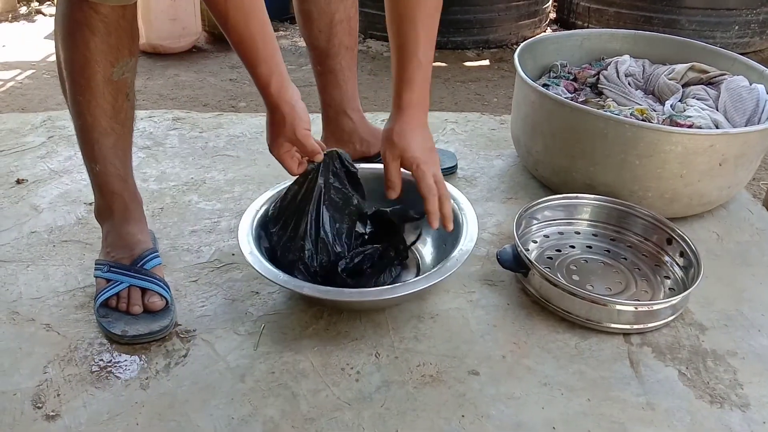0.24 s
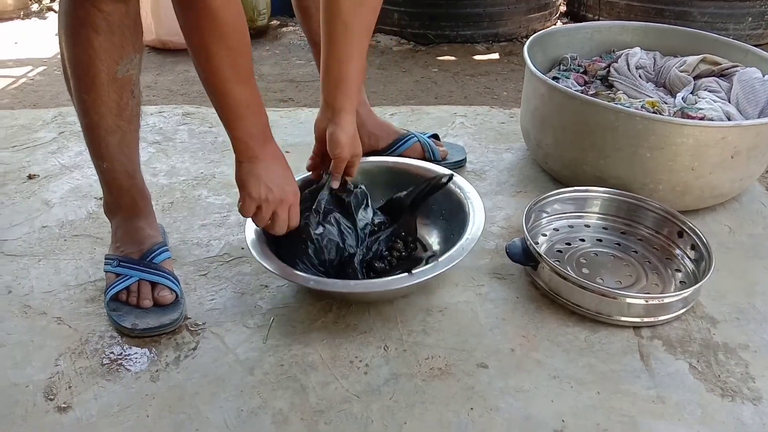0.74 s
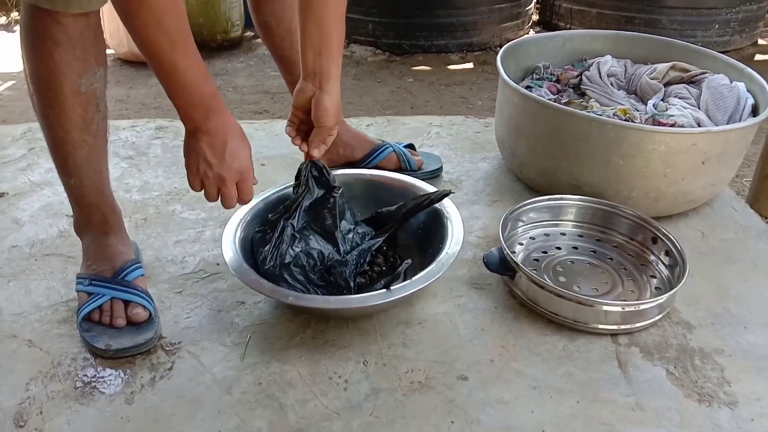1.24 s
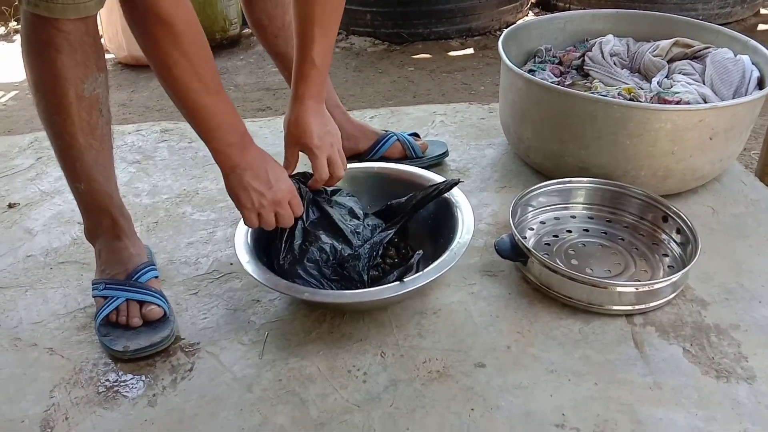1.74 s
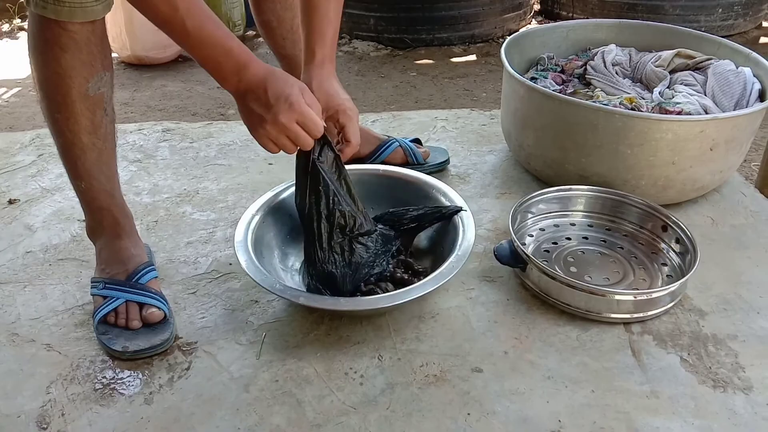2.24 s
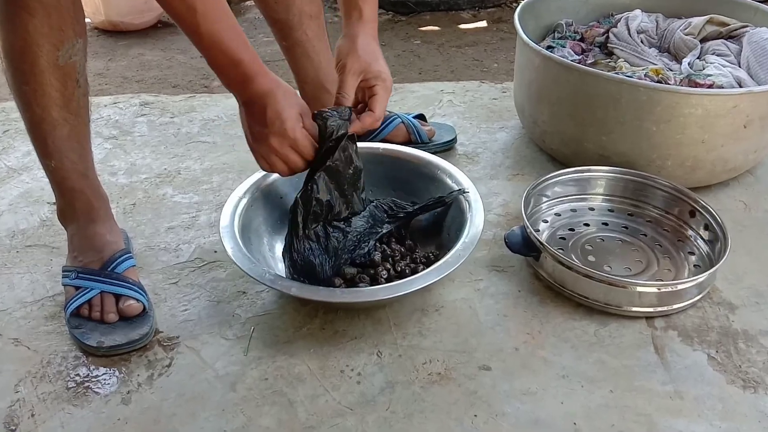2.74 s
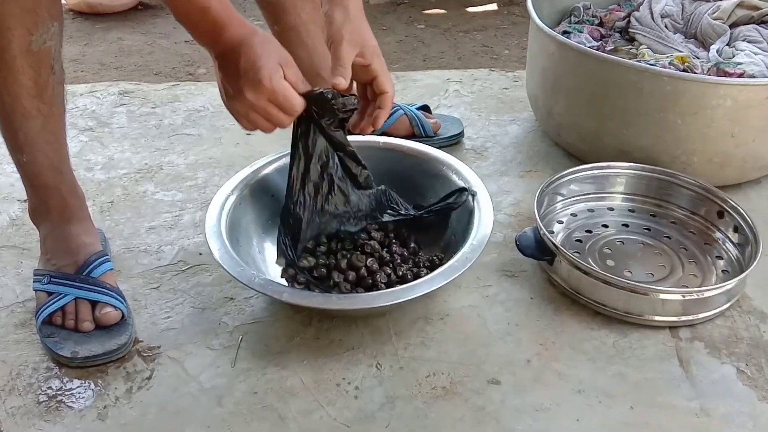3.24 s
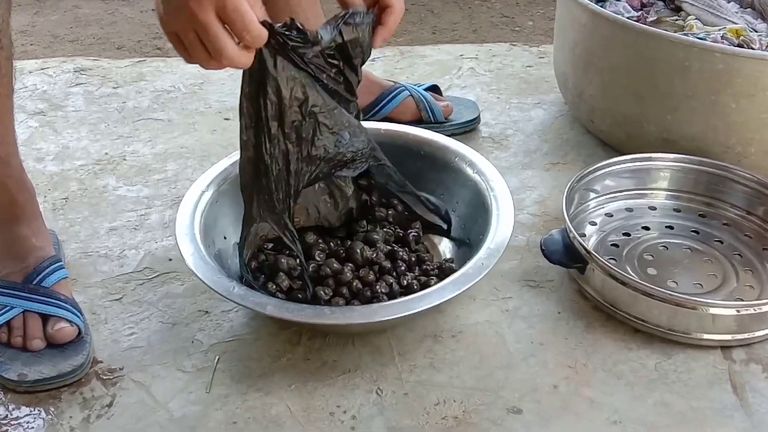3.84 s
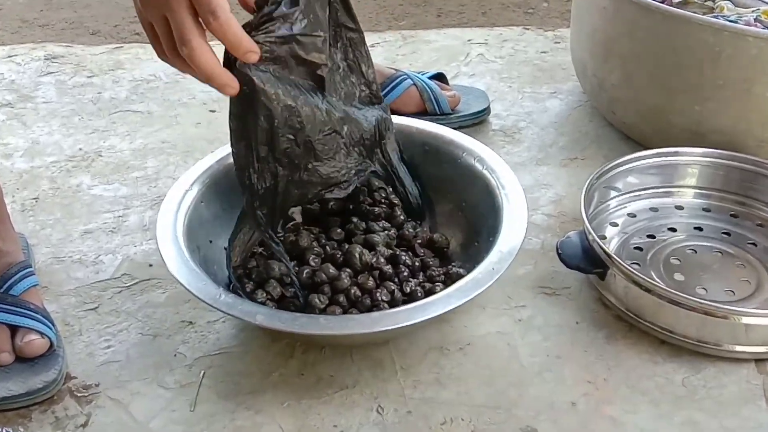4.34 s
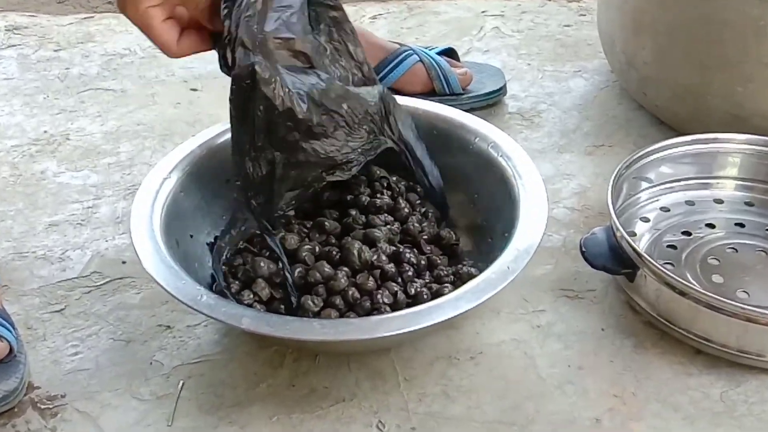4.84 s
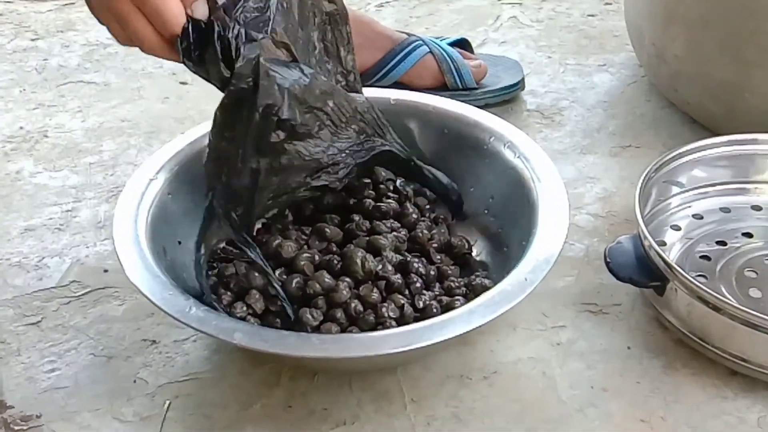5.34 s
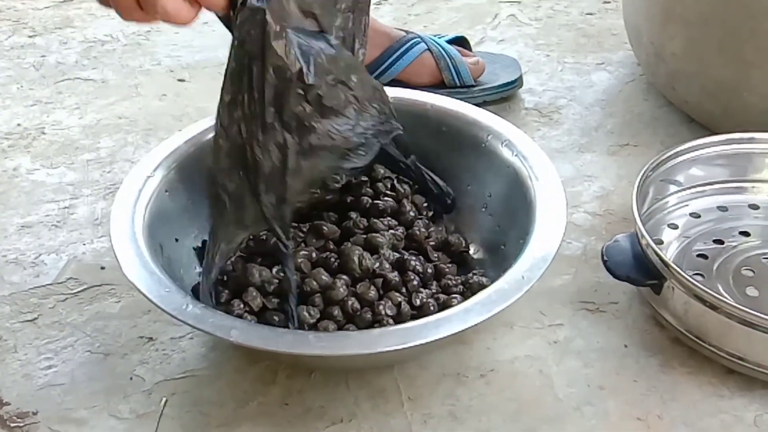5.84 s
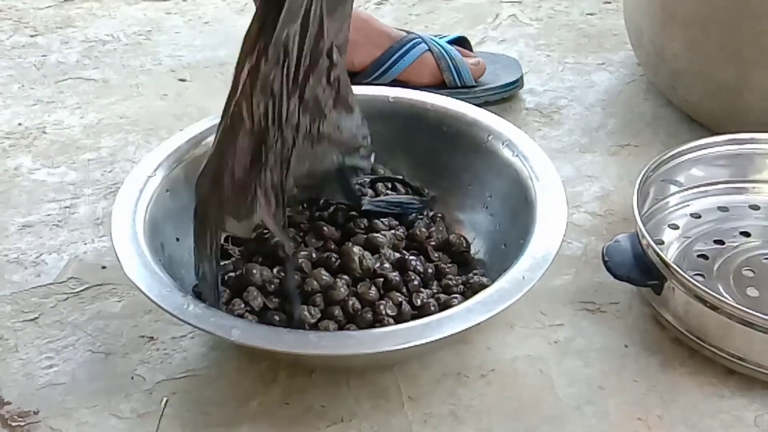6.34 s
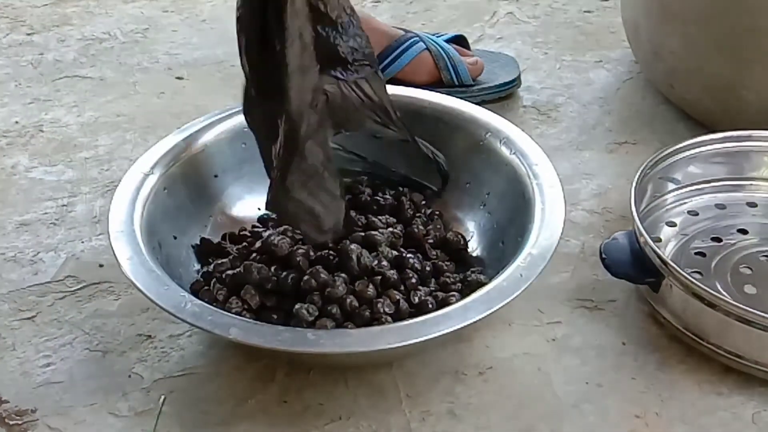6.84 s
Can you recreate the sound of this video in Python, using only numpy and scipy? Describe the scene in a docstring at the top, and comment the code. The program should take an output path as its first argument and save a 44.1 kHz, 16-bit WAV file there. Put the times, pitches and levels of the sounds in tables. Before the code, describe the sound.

Hollow shells tumble from a thin plastic bag into a metal bowl on a hard floor. An opening clatter fades into crinkling, small scrapes and soft thuds; two strong rattling pours come in the middle, the later one duller as the heap grows. The rest is gentle plastic rustling with a few stray clicks. Heard close through a phone, nearly mono, over quiet low background rumble.

```python
"""Snail shells knock on a steel bowl and click on each other as they slide from a thin bag in gushes and trickles.
Random hails of short contacts make the flow and ring the bowl's modes; hard landings stand out singly.
The plastic bag crackles in swarms of creases over a sliding hiss, snaps when taut, and sticks and slips on the rim.
Decaying sines make the soft handling bumps and the low boom of the bowl rocking on a concrete floor.
A low rumble of filtered noise lies behind, and all of it is heard close up through a phone."""
import sys
import numpy as np
from scipy import signal
from scipy.fft import rfft, irfft
from scipy.io import wavfile
from scipy.ndimage import uniform_filter1d

SR = 44100
rng = np.random.default_rng(int(sys.argv[2]) if len(sys.argv) > 2 else 0)


def store_wav(level_fs):
    """Save 16-bit WAV to argv[1]."""
    pcm = np.round(np.clip(np.atleast_2d(level_fs), -1, 1) * 32767)
    wavfile.write(sys.argv[1], SR, pcm.T.astype(np.int16))


N = 312757
T = np.arange(N) / SR  # time axis, s

# Levels in the tables are mix settings; each source adds its own trim or random spread.
# Shells slide out of the bag in gushes and trickles; rise and fall are times for a tenfold change:
# full_flow_s, hold_s, rise_s, fall_s, knock_level_db, click_level_db, film_level_db
GUSHES = [(0.008, 0.019, 0.09, 0.18, -34.5, -24.5, -40), (2.081, 0.16, 0.18, 0.092, -37.5, -32, -33.5),
          (3.191, 0.048, 0.038, 0.06, -53, -43, -42), (3.322, 0.26, 0.17, .12, -40.5, -38, -38),
          (3.905, 0.093, 0.13, .1, -56.5, -51.5, -54.5), (4.062, 0.0083, 0.027, 0.043, -50, -40, -39),
          (4.15, 0.14, 0.028, 0.078, -46.5, -43.5, -37)]
KNOCK_LEAD_S = 0.053  # the first shells reach the steel before the crowd; at most half the rise
FLOW_SAG_DB_PER_S = 7
CLUMP_DB, CLUMPS_PER_S = 1.5, 41  # shells leave the bag in clumps

# Shells scrape or shift over the steel while the bag is moved: start_s, hold_s, knock_level_db, click_level_db
SCRAPES = [(0.191, 0.042, -53, -48.5), (0.294, 0.044, -44, -44), (0.379, 0.067, -72, -48.5),
           (0.614, 0.24, -55, -47.5), (0.864, 0.11, -59, -56.5), (1.495, 0.064, -52, -60.5),
           (1.887, .05, -46, -52), (2.436, 0.073, -55.5, -78)]
SCRAPE_RISE_S, SCRAPE_FALL_S = 0.051, 0.043

# Single shells that land hard: start_s, level_db, click_db (relative to the knock), shell_pitch_hz
LANDINGS = [(0.005, -23.5, 10.5, 1790), (0.014, -21, 1.5, 2780), (0.116, -18, -16, 1830),
            (0.15, -20.5, -4, 1660), (0.331, -30.5, -15, 2710), (0.443, -45.5, 11, 2040),
            (0.636, -33.5, -1, 2220), (1.383, -36, -24, 1820), (1.407, -38, -17, 1710),
            (1.515, -26.5, -24, 1460), (1.946, -21.5, -29, 1760), (1.971, -17, -4.5, 1630),
            (2.009, -13.5, -8, 1610), (2.04, -19, -18, 1620), (2.067, -17, 6, 1645),
            (2.084, -15.5, 1, 1690), (2.125, -17, -20, 1780), (2.16, -22, 1, 1750),
            (2.182, -25.5, 7.5, 1720), (2.21, -16.5, -18, 1880), (3.18, -37.5, 11.5, 1670),
            (3.217, -38.5, 6, 2700), (3.266, -36, 4, 1630), (3.3, -45, -12, 1920), (3.314, -41.5, 20, 1700),
            (3.397, -18, -18, 1730), (3.436, -20.5, 0, 1625), (3.463, -18, -6, 1810),
            (3.499, -20, -11, 1680), (3.524, -21, 1, 2087), (3.598, -22, -27, 1740),
            (3.623, -24, -21, 2080), (3.893, -46, 18, 1600), (3.965, -30, -7, 2140), (4.036, -28, -9, 1770),
            (4.055, -26, 2.5, 1830), (4.102, -29.5, 3.5, 1620), (4.14, -28.5, -2, 1750),
            (4.161, -22, -6, 2010), (4.194, -22.5, -8, 1640), (4.267, -42, 10, 1810),
            (4.842, -43, -12.5, 3070), (6.312, -44, 3, 1790), (7.04, -44, 5, 1560)]

# Modes of the steel bowl: pitch_hz, level_db, t60_s
BOWL_MODES = [(493, -15, 0.42), (532.7, 12.5, 0.53), (550.4, 3.5, 0.282), (711, 12.5, 0.28),
              (836, -12.5, 0.46), (1034, -10.5, 0.33), (1099, 4, 0.5), (1235, 2, 0.37), (1565, 5.5, 0.25),
              (1620, -3.5, 0.16), (1684, -13, 0.83), (1970, -25, 0.146), (2313, -2, 0.64), (2550, 2, 0.18),
              (2580, -10, 0.21), (2744, -0.5, 0.14), (3186, -1, 0.36), (4200, -19, 0.22)]

# Spectra of a knock on steel and of a click between shells: frequency_hz, level_db
KNOCK_SPECTRUM = [(100, -27.5), (250, -7.5), (380, -7.5), (480, 5.5), (750, 1), (950, 2), (1300, 0),
                  (1800, -18.5), (3000, -21), (8000, -60)]
SHELL_SPECTRUM = [(400, -55.5), (1100, -18.5), (1450, -11.5), (1700, 12.5), (2200, 5.5), (2800, 5.5),
                  (3400, -0.5), (4800, -15), (5700, -13.5), (6600, -25), (7300, -30), (10000, -42.5),
                  (16000, -41)]

# The hands tug and shake the bag, and it rubs the rim: start_s, hold_s, film_level_db, rim_level_db
TUGS = [(0.177, 0.13, -55.5, -62), (0.336, 0.01, -64, -39.5), (0.367, 0.058, -58, -44.5),
        (0.615, 0.19, -54, -49), (0.832, 0.15, -53.5, -57), (1.03, 0.19, -63, -65.5),
        (1.255, .05, -63.5, -61), (1.507, 0.064, -58, -63), (1.7, 0.077, -61, -75), (1.793, 0.21, -48, -49),
        (2.32, 0.043, -53, -48.5), (2.417, 0.075, -53, -48.5), (2.608, 0.26, -66.5, -68.5),
        (2.84, 0.017, -62.5, -64), (2.973, 0.21, -55.5, -53.5), (3.71, 0.62, -52.5, -52.5),
        (4.416, 0.097, -52, -59.5), (4.572, 0.2, -64, -67), (4.773, 0.073, -59, -56),
        (4.838, 0.023, -48, -55), (4.964, 0.14, -71.5, -79), (5.135, 0.15, -57, -60.5),
        (5.366, 0.098, -61, -63), (5.553, 0.028, -53, -58), (5.675, 0.013, -47.5, -51.5),
        (5.762, 0.15, -60.5, -64.5), (5.937, 0.097, -52.5, -58), (6.094, .15, -52, -57),
        (6.297, 0.027, -52, -51.5), (6.37, .02, -53, -70), (6.436, .045, -48.5, -52.5),
        (6.54, 0.097, -51.5, -60.5), (6.698, 0.055, -51.5, -61.5), (6.77, 0.045, -49, -65),
        (6.87, 0.13, -54.5, -55.5), (7.03, 0.08, -50, -56)]
TUG_RISE_S, TUG_FALL_S = 0.062, 0.067
TUG_SAG_DB_PER_S = 9  # scrapes sag at this rate too
STIR_KNOCK_DB, STIR_CLICK_DB = -19, -13.5  # each tug stirs the heap; relative to its film level

# Spectra of the crackling film and of its sharp snaps: frequency_hz, level_db
FILM_SPECTRUM = [(200, -26), (700, -6.5), (1500, -8), (2900, -11), (3900, 2), (4700, 2), (5700, -7.5),
                 (6600, -22), (7200, -20), (10000, -28.5), (13000, -27.5), (16000, -30)]
SNAP_SPECTRUM = [(300, 6), (1500, 6.5), (3000, 2), (5500, 6.5), (8000, -4.5), (12000, -15.5), (16000, -9.5)]

# Sharp snaps of the film: start_s, level_db
SNAPS = [(0.7263, -20), (1.3831, -31), (2.4114, -41)]

# The rim's note as the bowl fills: time_s, pitch_hz, lower_partner_db (relative to the upper note)
RIM_NOTES = [(.3, 1211, -5), (2.3, 1222, 2), (4.4, 1245, -6.5)]
RIM_FLUTTER_DB = 3

# The foot of the bowl taps the floor: start_s, boom_level_db, contact_db (relative to the boom level)
FLOOR_TAPS = [(0.286, -37, -12), (1.7835, -25, -6), (1.808, -40.5, 20), (1.8336, -46, 26),
              (1.854, -35, 15.5)]

# Soft low bumps of the handling: start_s, level_db, pitch_hz, contact_db (relative to the bump level)
BUMPS = [(0.554, -33.5, 146, -80), (0.596, -39.5, 89, -7), (0.616, -42.5, 91.5, -6),
         (0.723, -18.5, 121, -47), (0.78, -41.5, 138, 4.5), (1.025, -35.5, 114, -22),
         (1.383, -36, 90, -18.5), (1.406, -24.5, 83, -25), (1.728, -17.5, 105, -20),
         (4.571, -34.5, 95, -19.5), (4.948, -45, 110, -17.5), (4.989, -41, 111.6, -32),
         (5.288, -42, 100, -33), (5.395, -40.5, 78, -27), (5.821, -47, 64.7, -13.5),
         (6.178, -45, 79.5, -15), (6.309, -46, 173, -17), (6.622, -44, 112, -35), (6.89, -49, 164, -8),
         (6.976, -35.5, 91, -22)]

# Spectrum of the background air: frequency_hz, level_db
AIR_SPECTRUM = [(25, -27.5), (50, 3), (110, 6), (190, 3.5), (300, -6.5), (600, -13), (1400, -21),
                (2800, -33.5), (4400, -29), (6500, -42.5), (16000, -40)]

# Slow level of the low rumble: time_s, level_db
RUMBLE_LEVEL = [(0, -58.5), (1.6, -54), (2.7, -60), (4.3, -59.5), (5.5, -64), (7, -62)]

# Resonances of the microphone housing: left_hz, right_hz, width_hz, level_db
MICROPHONE_RESONANCES = [(1250, 1250, 90, 5), (15060, 15240, 750, 19)]
TOP_HZ = 15700


def activity():
    """How strongly shells knock, shells click and the film crackles: gushes, scrapes and tugs add in power."""
    knocking, clicking, crackling = np.zeros((3, N))
    clumps = amp(CLUMP_DB * wander(CLUMPS_PER_S))
    clumps /= np.sqrt(np.mean(clumps ** 2))
    for s, hold, rise, fall, knock_db, click_db, film_db in GUSHES:
        lead = min(KNOCK_LEAD_S, rise / 2)
        flow = swell(s, hold, rise, fall, FLOW_SAG_DB_PER_S)
        early_flow = swell(s - lead, hold + lead, rise, fall, FLOW_SAG_DB_PER_S)
        knocking += (amp(knock_db) * early_flow * clumps) ** 2
        clicking += (amp(click_db) * flow * clumps) ** 2
        crackling += (amp(film_db) * flow) ** 2
    for s, hold, knock_db, click_db in SCRAPES:
        scrape = swell(s, hold, SCRAPE_RISE_S, SCRAPE_FALL_S, TUG_SAG_DB_PER_S)
        knocking += (amp(knock_db) * scrape) ** 2
        clicking += (amp(click_db) * scrape) ** 2
    for s, hold, film_db, _ in TUGS:
        film = amp(film_db) * tug(s, hold)
        knocking += (amp(STIR_KNOCK_DB) * film) ** 2
        clicking += (amp(STIR_CLICK_DB) * film) ** 2
        crackling += film ** 2
    return np.sqrt([knocking, clicking, crackling])


def shells(knocking, clicking, count=10):
    """A hail of shells on many spots: each knocks on the steel, clicks on its neighbours and rings the bowl."""
    # Louder knocking is also denser, in impacts per second.
    rate = 260 + 380 * np.sqrt(knocking / amp(-35.5))
    # Scraping shells make a finer hail.
    for s, hold, _, _ in SCRAPES:
        rate += 1200 * ((T > s - SCRAPE_RISE_S) & (T < s + hold + SCRAPE_FALL_S))
    bare = bare_steel(T)
    out = np.zeros(N)
    for _ in range(count):
        stream = hail(rate / count, spread_db=4) / np.sqrt(count)
        knocks = amp(1.0) * stream * knocking
        clicks = amp(-2.0) * stream * clicking
        low_ring, high_ring = steel()
        out += through(knocks, contact(KNOCK_SPECTRUM, t60=0.042, chatter_db=12.5))
        out += through(clicks, contact(SHELL_SPECTRUM, t60=0.025, chatter_db=7))
        out += amp(-4) * through(knocks * bare, low_ring)
        out += amp(-9) * through(clicks * bare, high_ring)
    return out


def landings():
    """Hard landings stand out of the hail: a knock, the click and ring of the shell, a short ring of the steel."""
    out = np.zeros(N)
    for s, db, click_db, shell_hz in LANDINGS:
        low_ring, high_ring = (bare_steel(s) * peaked(ring) for ring in steel())
        knock = peaked(contact(KNOCK_SPECTRUM, t60=0.055, chatter_db=10)) + amp(-10) * low_ring
        click = peaked(contact(SHELL_SPECTRUM, t60=0.035, chatter_db=12)) + amp(-16) * high_ring
        add(out, s, amp(db - 4.0) * (knock + amp(click_db) * click))
        add(out, s, amp(db + click_db - 7) * hollow(shell_hz, t60=0.04))
    return out


def hollow(hz, t60, size=8192):
    """The brief ring of one hollow shell: a decaying sine."""
    return np.sin(2 * np.pi * hz * T[:size]) * fade(t60, size)


def steel(size=8192):
    """Low and high ring of the bowl struck at a random spot; each spot's modes are detuned a little at random."""
    hz, db, t60 = np.transpose(BOWL_MODES)
    detune, spot = rng.standard_normal((len(hz), 2)).T
    gain = amp(db + 3.8 * spot) * rng.choice([-1, 1], len(hz))
    waves = np.sin(2 * np.pi * np.outer(hz * (1 + 0.013 * detune), T[:size]))
    decays = np.exp(-np.log(1000) * T[:size] / t60[:, None])
    modes = gain[:, None] * waves * decays
    low = hz < 1500
    return unit(modes[low].sum(axis=0)), unit(modes[~low].sum(axis=0))


def bare_steel(s):
    """Gain of the ring at time s: the growing heap muffles the bowl."""
    return amp(np.interp(s, [0, 2, 4.5], [-1, -1, -4]))


def bag(crackling, count=5):
    """Creases of the thin film buckle in swarms over a fine sliding hiss."""
    creases = np.zeros(N)
    for _ in range(count):
        buckles = hail(200, spread_db=5)
        creases += through(buckles, contact(FILM_SPECTRUM, t60=0.02, chatter_db=7))
    sliding = through(rng.standard_normal(N), colour(FILM_SPECTRUM))
    film = amp(-2) * creases / np.sqrt(count) + amp(-7) * sliding
    flicker = amp(-3.5 + 3.4 * wander(35))
    return crackling * flicker * film


def snaps():
    """Single bright cracks of taut film: a tick with a little chatter."""
    out = np.zeros(N)
    for s, db in SNAPS:
        crack = peaked(contact(SNAP_SPECTRUM, t60=0.03, chatter_db=-13))
        add(out, s, amp(db + 2) * crack)
    return out


def rim():
    """The film sticks and slips on the rim and keeps two notes ringing, whose pitch and balance drift."""
    out = np.zeros(N)
    slips = hail(1500, spread_db=3)
    times, pitches, partners = np.transpose(RIM_NOTES)
    for s, hold, _, db in TUGS:
        near = np.abs(T - s - hold / 2) < 0.5
        hz = np.interp(s, times, pitches)
        partner = amp(np.interp(s, times, partners))
        upper, lower = (resonate(resonate(slips[near], f, width=95), f, width=95) for f in (hz, 0.868 * hz))
        ring = upper + partner * lower
        # Level the ring so that the pull sets the strength.
        steady = ring / np.sqrt(uniform_filter1d(ring ** 2, size=2000) + 1e-12)
        out[near] += amp(db) * tug(s, hold)[near] * steady
    return amp(-7 + RIM_FLUTTER_DB * wander(40)) * out


def tug(s, hold):
    """Strength of one tug on the bag."""
    return swell(s, hold, TUG_RISE_S, TUG_FALL_S, TUG_SAG_DB_PER_S)


def rocking(size=22050):
    """Each tap on the floor feeds the bowl's lowest mode, which sinks under the load until the gush smothers it."""
    taps, swing = np.zeros((2, N))
    for s, db, contact_db in FLOOR_TAPS:
        add(swing, s, amp(db) * (1 - fade(0.017, size)) * fade(0.38, size))
        add(taps, s, -amp(db + contact_db) * push(0.0004, size))
    boom_hz = np.interp(T, [0.4, 1.85, 1.95], [100, 85, 72])
    boom = np.sin(2 * np.pi * np.cumsum(boom_hz) / SR)
    free = np.interp(T, [1.935, 1.96], [1, 0])
    return taps + free * swing * boom


def bumps(size=16384):
    """Dull, heavily damped bumps; the gentler the touch, the slower they rise and the longer they sway."""
    out = np.zeros(N)
    for s, db, hz, contact_db in BUMPS:
        gentle = np.interp(db, [-44, -32], [1, 0])
        envelope = (1 - fade(0.003 + 0.04 * gentle, size)) * fade(0.042 + 0.06 * gentle, size)
        sway = np.sin(2 * np.pi * hz * T[:size]) * envelope
        add(out, s + 0.00239, amp(db + 3.0) * sway)
        # The contact pulse starts about a millisecond ahead of the sway.
        add(out, s + 0.0013, -amp(db + contact_db + 18.0 - 2.8 * gentle) * push(0.00085, size))
    return out


def air():
    """Faint background of filtered noise, mostly a low rumble that swells unevenly."""
    level_db = np.interp(T, *np.transpose(RUMBLE_LEVEL)) + 0.48 * wander(4.3)
    return amp(level_db) * through(rng.standard_normal(N), colour(AIR_SPECTRUM))


def hail(rate, spread_db):
    """Random impacts of uneven size and sign, about unit rms at any rate per second."""
    size = amp(spread_db * np.clip(rng.standard_normal(N), -2, 2)) * rng.choice([-1, 1], N)
    hits = rng.random(N) < rate / SR
    return hits * size / size.std() * np.sqrt(SR / rate)


def contact(spectrum, t60, chatter_db, size=8192):
    """One contact: a sharp tick and a brief chatter of whatever lies next to it."""
    burst = amp(chatter_db) * unit(rng.standard_normal(size) * fade(t60, size))
    burst[0] += 1
    return unit(signal.fftconvolve(burst, colour(spectrum))[:size])


def push(seconds, size):
    """A soft contact: a rounded one-sided pulse of unit height that peaks after the given time."""
    age = T[:size] / max(seconds, 1e-5)
    return (age * np.exp(1 - age)) ** 2


def swell(s, hold, rise, fall, sag_db):
    """Attack, hold sagging by sag_db a second, release; rise and fall are the times for a tenfold change."""
    early = np.maximum(s - T, 0) / max(rise, 1e-3)
    late = np.maximum(T - s - hold, 0) / max(fall, 1e-3)
    return amp(-20 * (early + late) - sag_db * np.clip(T - s, 0, hold))


def wander(rate):
    """Smooth random motion with unit spread that changes about rate times a second."""
    step = int(SR / rate)
    steps = np.repeat(rng.standard_normal(N // 100)[:N // step + 1], step)[:N]
    smooth = uniform_filter1d(uniform_filter1d(steps, step), step)
    return smooth / smooth.std()


def fade(t60, size):
    """Exponential decay that falls 60 dB in t60 seconds."""
    return np.exp(-np.log(1000) * T[:size] / max(t60, 1e-4))


def colour(points, size=2048):
    """Causal unit-energy response with the given spectrum, made minimum-phase by folding its cepstrum."""
    hz, db = np.transpose(points)
    bins = np.maximum(np.fft.rfftfreq(size, 1 / SR), 1)
    level_db = np.interp(np.log(bins), np.log(hz), db)
    cepstrum = irfft(np.log(amp(level_db)))
    cepstrum[1:size // 2] *= 2
    cepstrum[size // 2 + 1:] = 0
    return unit(irfft(np.exp(rfft(cepstrum))))


def resonate(x, hz, width):
    """A resonance with unit gain at its centre and a width in Hz."""
    return signal.lfilter(*signal.iirpeak(hz, hz / width, fs=SR), x)


def through(x, response):
    """Pass a signal through a response."""
    return signal.oaconvolve(x, response)[:N]


def add(track, s, sound):
    """Mix a sound into a track at time s."""
    start = int(np.clip(s * SR, 0, N - 1))
    track[start:start + len(sound)] += sound[:N - start]


def amp(db):
    """Decibels to gain."""
    return 10 ** (np.asarray(db) / 20)


def unit(x):
    """Scale a response to unit energy."""
    return x / np.sqrt(np.sum(x ** 2))


def peaked(x):
    """Scale a response to unit peak."""
    return x / np.abs(x).max()


def scene():
    """Sources sit in the middle with a faint stereo spread; floor and walls add a short, weak tail."""
    knocking, clicking, crackling = activity()
    near = shells(knocking, clicking) + landings() + rim() + bag(crackling) + snaps()
    size = SR // 2
    late = T[:size] > 0.004
    tail, width = (unit(rng.standard_normal(size) * fade(0.16, size) * late) for _ in range(2))
    mid = near + amp(-10.5) * through(near, tail) + bumps() + rocking() + air()
    side = amp(-41) * through(mid, width)
    return np.array([mid + side, mid - side])


def record(dry):
    """The microphone housing rings at two pitches; the phone cuts the deepest bass and the top."""
    out = dry.copy()
    for left_hz, right_hz, width, db in MICROPHONE_RESONANCES:
        ring = np.array([resonate(dry[0], left_hz, width), resonate(dry[1], right_hz, width)])
        out += amp(db) * ring
    out = signal.sosfilt(signal.butter(4, 37, "high", fs=SR, output="sos"), out)
    return signal.sosfilt(signal.ellip(10, 0.2, 80, TOP_HZ, fs=SR, output="sos"), out)


dry = scene()
out = record(dry)
store_wav(out)
```